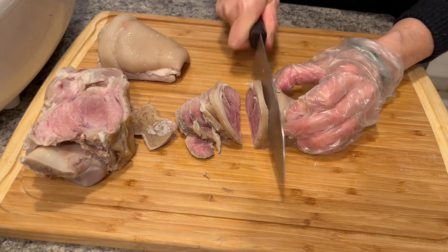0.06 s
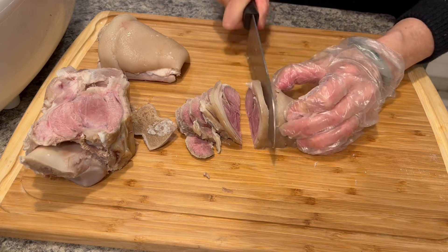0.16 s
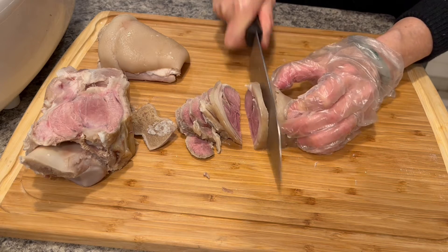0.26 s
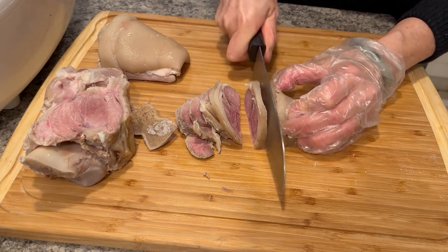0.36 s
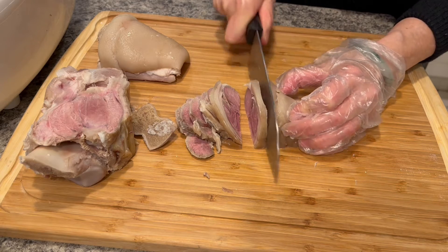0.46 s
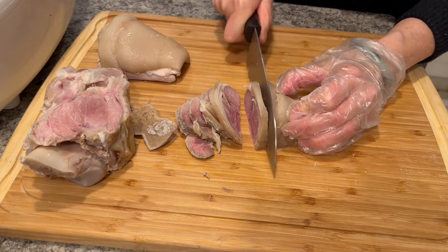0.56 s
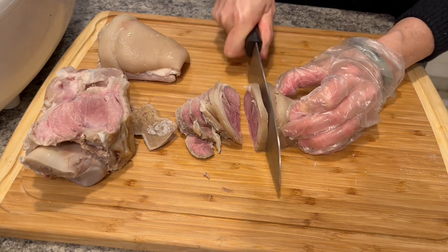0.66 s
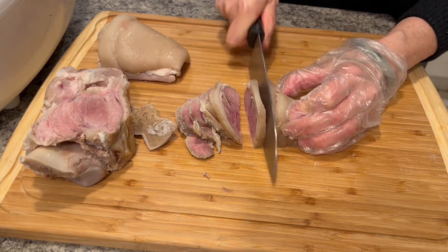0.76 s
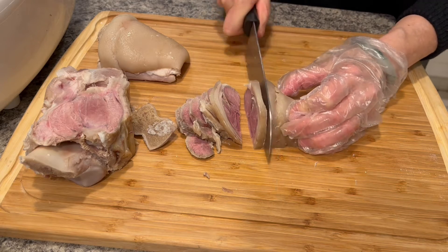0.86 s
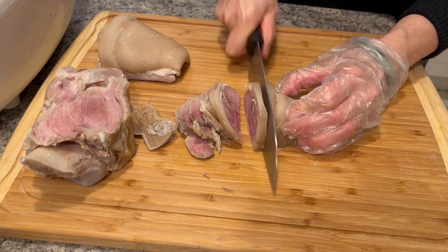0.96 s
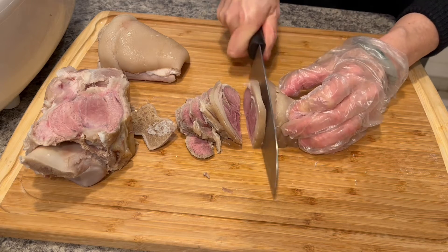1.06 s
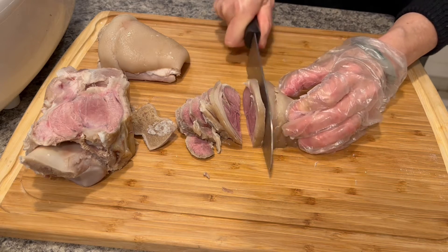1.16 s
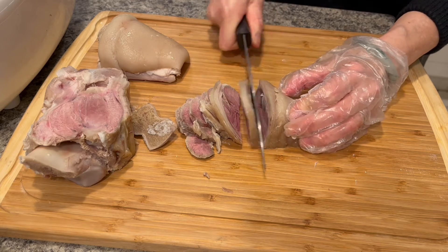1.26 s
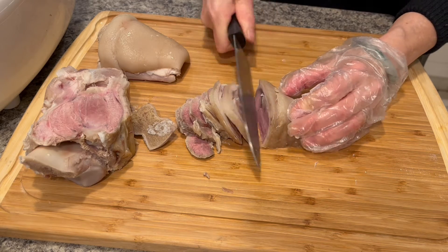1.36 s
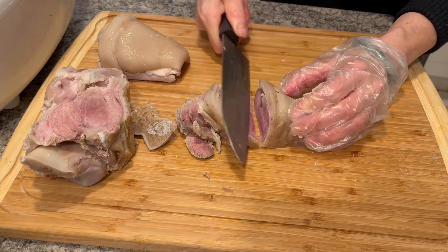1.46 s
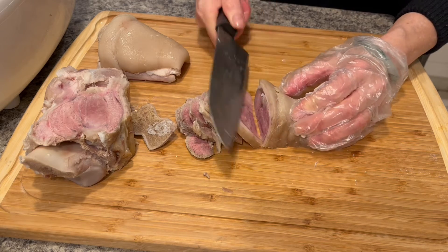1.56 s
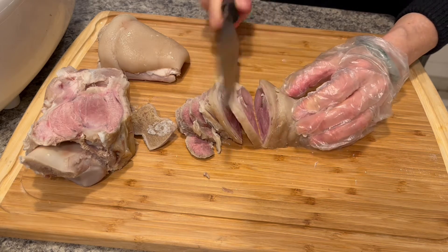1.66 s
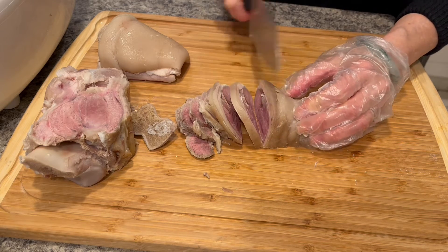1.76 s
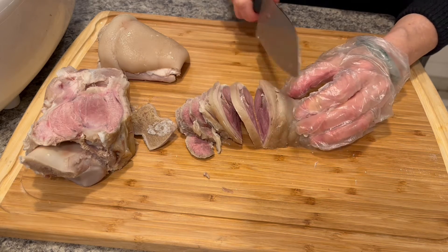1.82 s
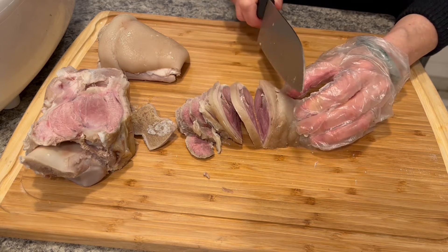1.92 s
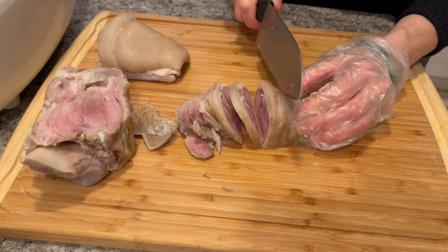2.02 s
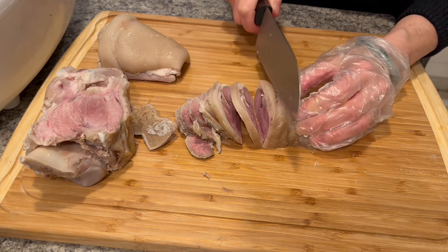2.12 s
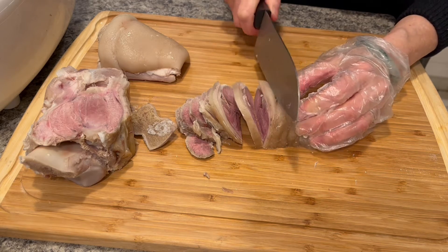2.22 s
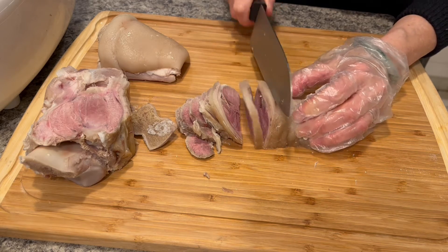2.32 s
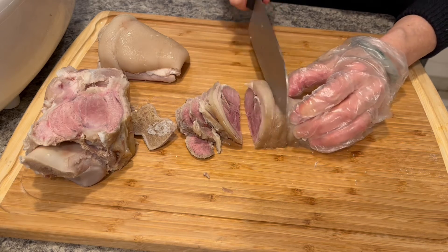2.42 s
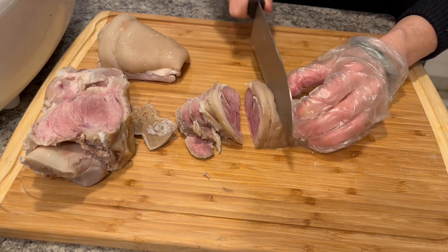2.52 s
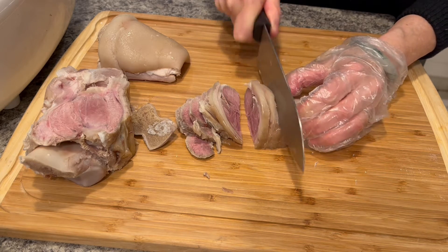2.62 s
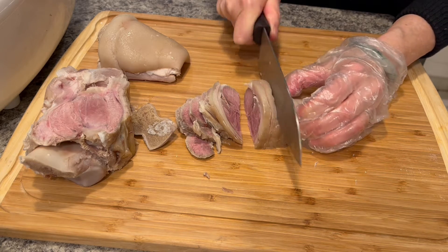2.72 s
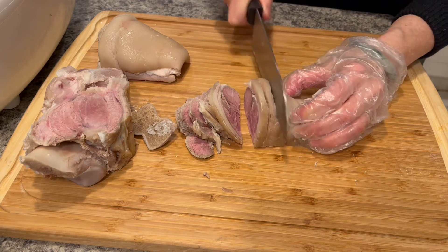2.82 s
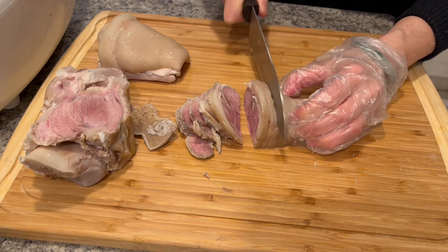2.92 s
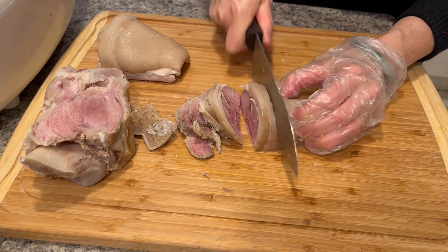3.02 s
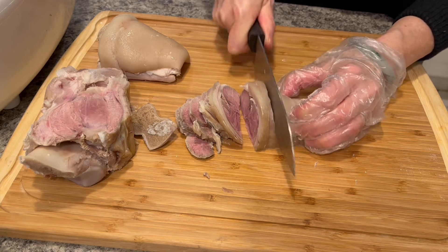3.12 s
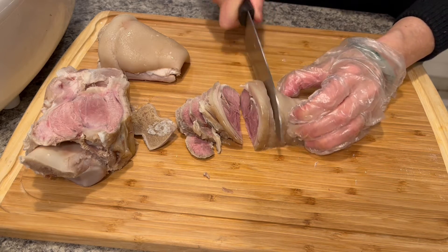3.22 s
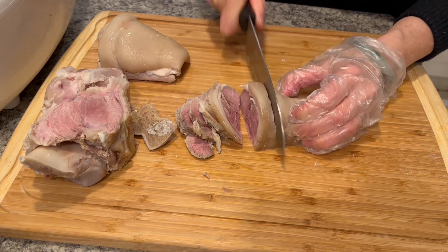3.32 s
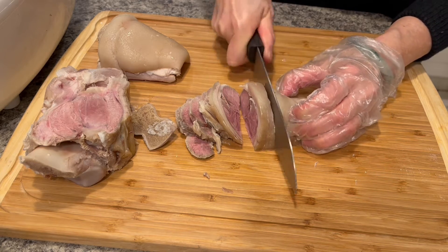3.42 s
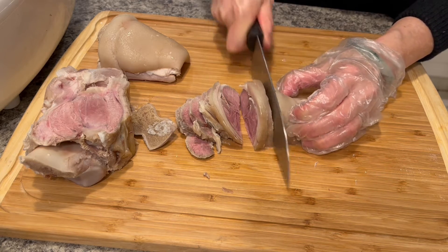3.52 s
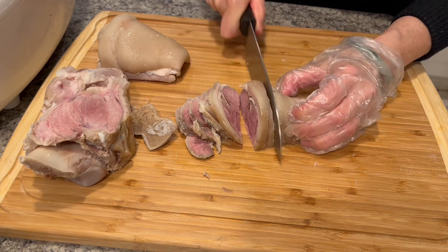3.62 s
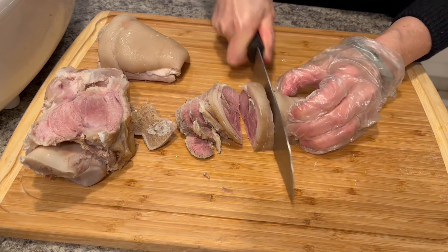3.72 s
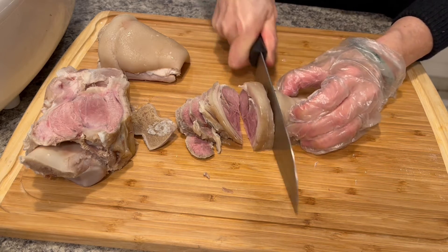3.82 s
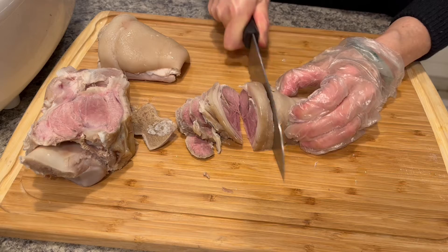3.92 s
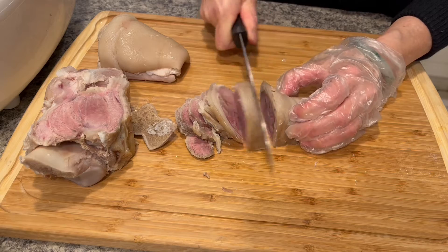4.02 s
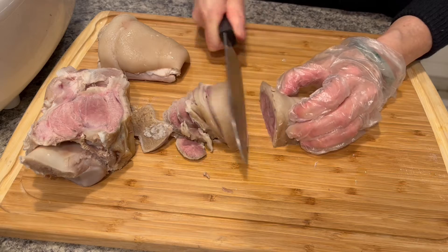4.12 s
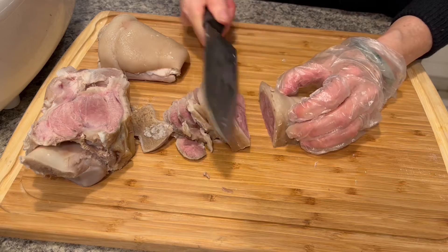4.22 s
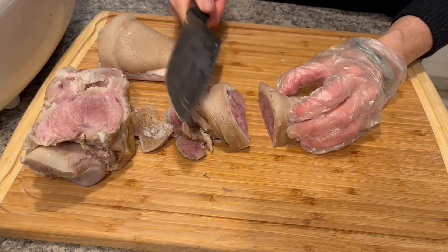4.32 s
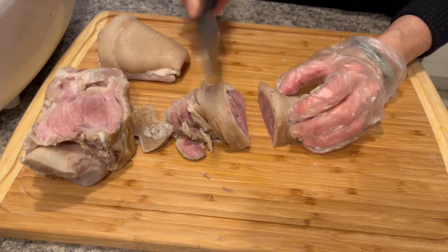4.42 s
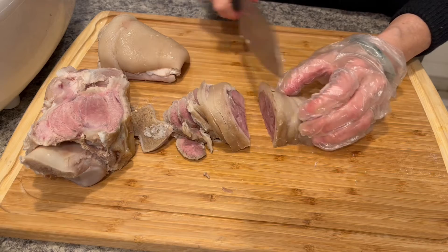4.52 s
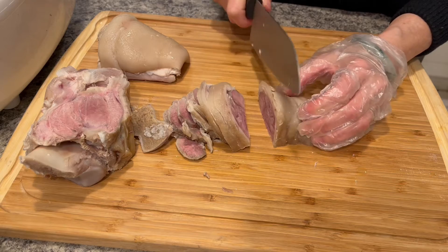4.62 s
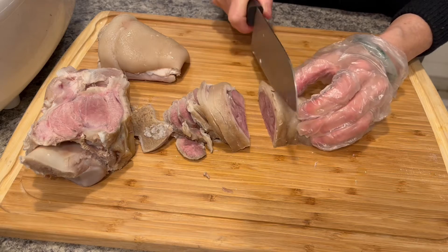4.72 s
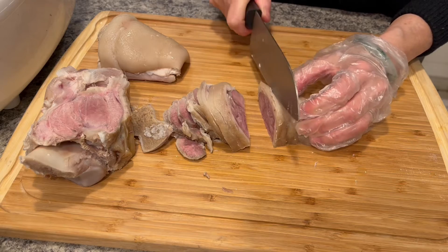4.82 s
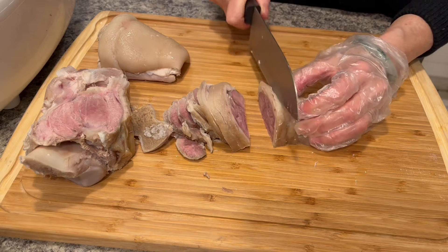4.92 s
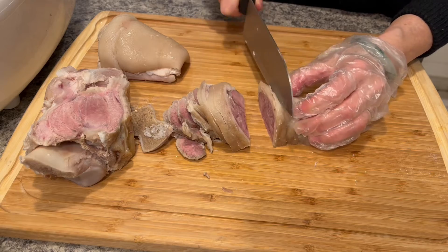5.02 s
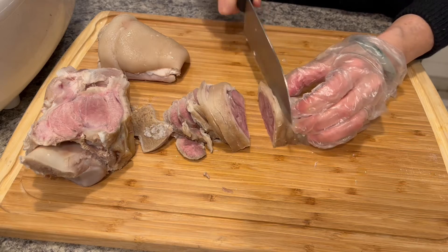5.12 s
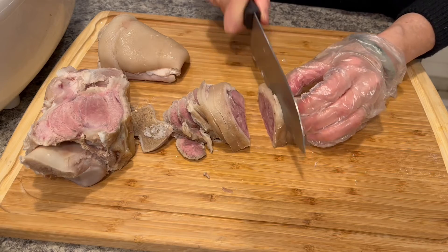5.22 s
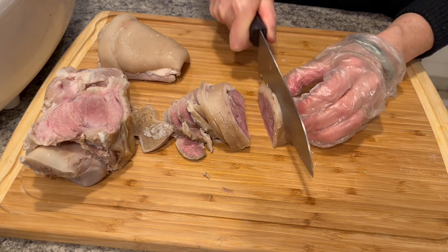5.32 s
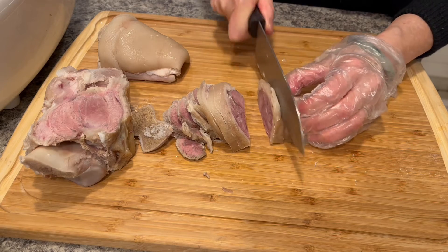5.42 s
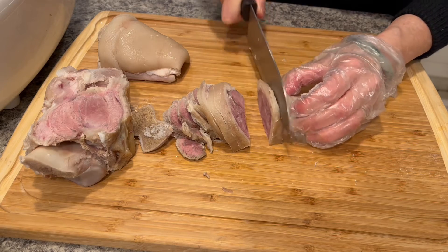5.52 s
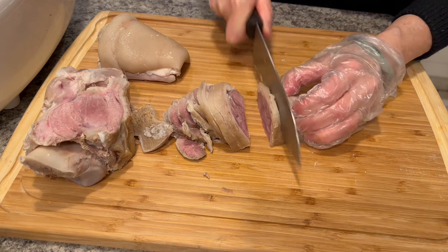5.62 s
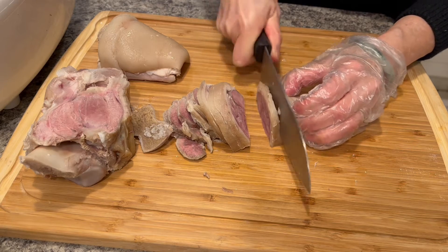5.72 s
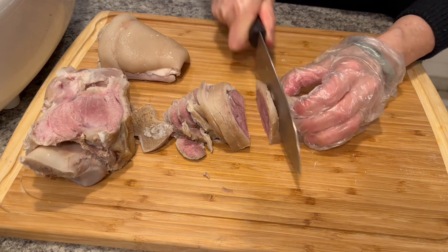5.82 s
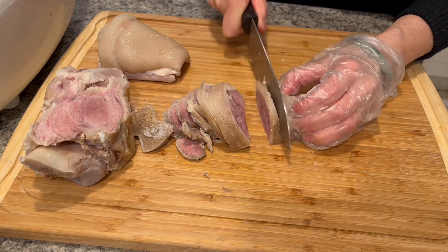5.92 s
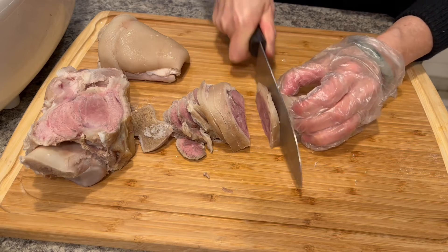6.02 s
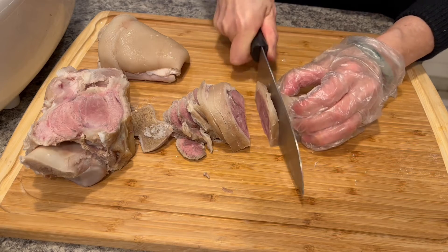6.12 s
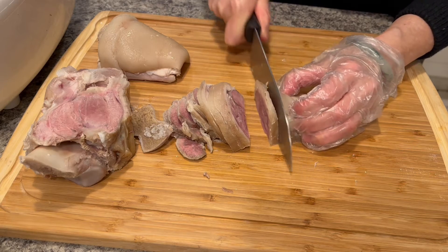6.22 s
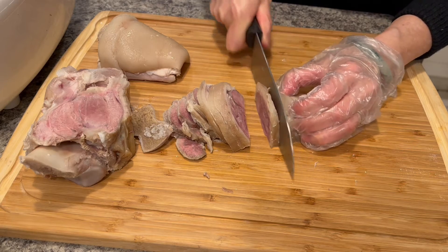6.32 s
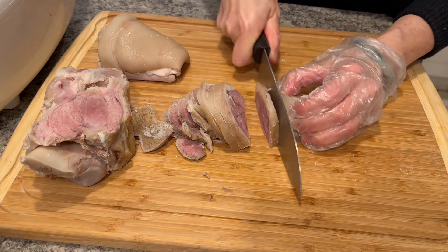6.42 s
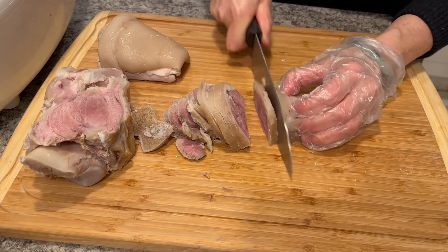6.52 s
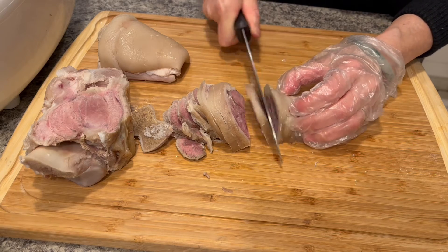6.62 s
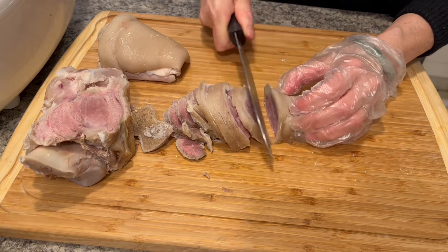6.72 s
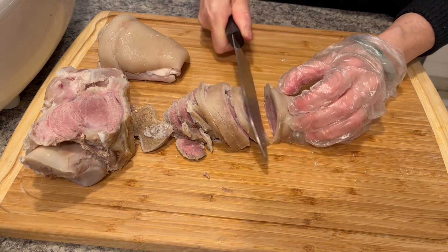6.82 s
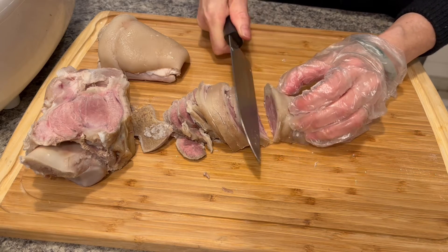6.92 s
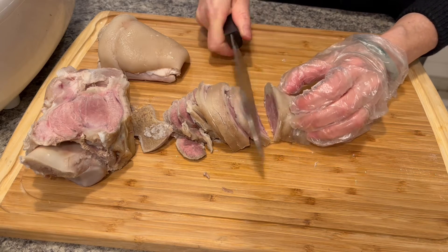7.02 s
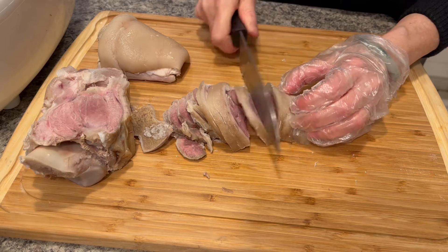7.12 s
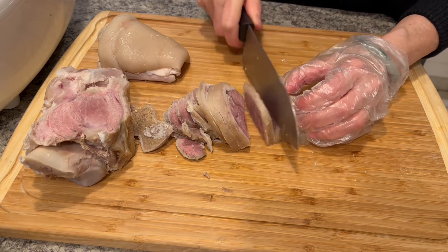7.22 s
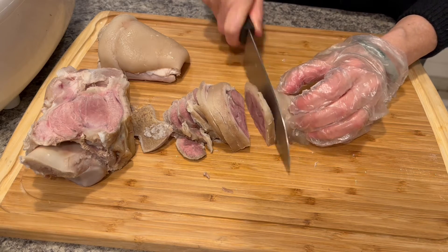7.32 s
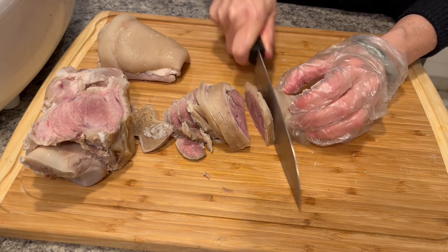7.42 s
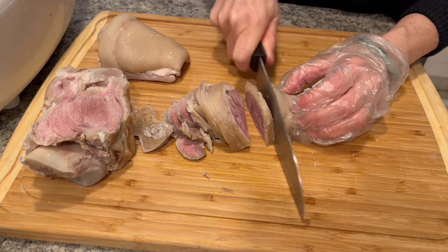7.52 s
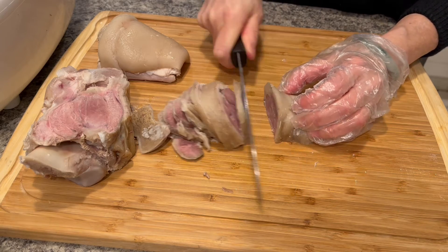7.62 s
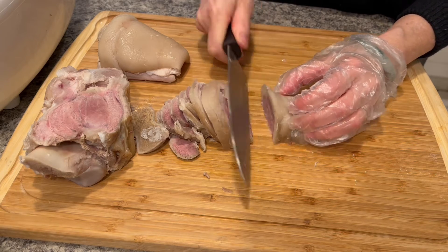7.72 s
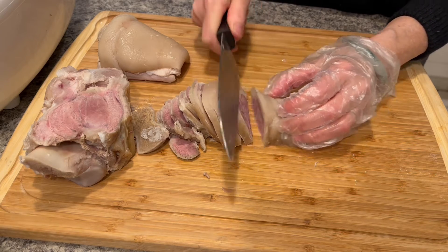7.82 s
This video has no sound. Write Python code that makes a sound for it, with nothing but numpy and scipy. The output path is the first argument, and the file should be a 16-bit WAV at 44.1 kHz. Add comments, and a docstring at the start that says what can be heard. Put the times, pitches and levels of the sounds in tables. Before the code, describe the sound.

Wet, fine crackling follows the back-and-forth strokes of a blade through skin and meat, with little snaps, fibre tears and plastic ticks. Dull bumps come from the meat rocking on a bamboo board. Three short woody scrapes with brief groans mark finished slices; a single sharp clack comes near the end and is by far the loudest event. Close microphone, short indoor reflections, quiet low hum.

```python
"""In a small kitchen, close to the microphone, a chef's knife saws slices off a cooked pork hock on bamboo.
Wet meat and a plastic glove crackle: random clicks, coloured, that follow the strokes. Soft thuds are short
low shudders. Three times the edge breaks through and grates, as slips that ring the board's modes, and is
drawn along the board. Near the end it comes down in one hard knock. Room noise and a faint hum lie beneath,
and counter and walls answer with short noise tails."""
import sys
import numpy as np
from scipy import signal
from scipy.fft import rfft, irfft, next_fast_len
from scipy.io import wavfile
from scipy.ndimage import uniform_filter1d

SR = 44100
rng = np.random.default_rng(int(sys.argv[2]) if len(sys.argv) > 2 else 0)


def file_out(sig):
    """Save sig as 16-bit WAV at sys.argv[1]."""
    # one column per channel
    cols = np.atleast_2d(sig).T
    # limit, then scale
    lim = np.clip(cols, -1, 1)
    pcm = np.round(lim * 32767).astype(np.int16)
    wavfile.write(sys.argv[1], SR, pcm)


N = 346626
T = np.arange(N) / SR


def undb(db):
    """Decibels to gain."""
    return 10 ** (np.asarray(db) / 20)


def unit(x):
    """Scale to rms 1."""
    return x / np.sqrt(np.mean(x ** 2))


def gains(points, size):
    """Gain at each bin of a transform, interpolated over log frequency between (f/Hz, level/dB) points."""
    hz, db = np.transpose(points)
    bins_hz = np.fft.rfftfreq(size, 1 / SR)
    return undb(np.interp(np.log(bins_hz + 1), np.log(hz), db))


def colour(x, points):
    """Filter a sound by the curve through (f/Hz, level/dB) points."""
    size = next_fast_len(x.shape[-1], True)
    return irfft(rfft(x, size) * gains(points, size), size)[..., :x.shape[-1]]


def butter(x, hz, kind, order=2):
    """Plain causal low- or high-pass."""
    return signal.sosfilt(signal.butter(order, hz, kind, fs=SR, output="sos"), x)


def add(out, s, x):
    """Mix x into out from time s on."""
    i = max(int(s * SR), 0)
    out[i:i + len(x)] += x[:N - i]


def fade(t, t60):
    """Exponential decay by 60 dB in t60 seconds."""
    return np.exp(-np.log(1000) * t / t60)


def ring(x, response):
    """Pass a sound through an impulse response."""
    return signal.fftconvolve(x, response)[:len(x)]


def clicks(size, rate, spread_db):
    """Random impulses at a mean rate per second, many small and a few large."""
    hit = rng.random(size) < rate / SR
    sign = rng.choice([-1, 1], size)
    return hit * sign * undb(spread_db * np.minimum(rng.exponential(size=size), 4))


def walk(hz):
    """Slow random wandering, spread about 1."""
    k = int(SR / hz / 2)
    steps = np.repeat(rng.standard_normal(N // k + 1), k)[:N]
    return 1.1 * uniform_filter1d(steps, k)


def shudder(hz, length, judder=0.55):
    """Uneven cycles of one pitch, a sine mixed with noise, that swell and die."""
    t = T[:int(length * SR)]
    shake = unit(butter(rng.standard_normal(SR // 2), 2 * hz, "low"))[:len(t)]
    return np.sin(np.pi * t / length) * (np.sin(2 * np.pi * hz * t) + judder * shake)


def pops(table, t60, octaves, trim_db, order):
    """Each rupture is a brief decaying noise burst around its own pitch, octaves to either side."""
    out, t = np.zeros(N), T[:SR // 20]
    for s, db, hz in table:
        burst = rng.standard_normal(len(t)) * fade(t, t60)
        burst = butter(burst, hz / 2 ** octaves, "high", order)
        pop = butter(burst, min(hz * 2 ** octaves, SR / 3), "low", order=3)
        add(out, s, undb(db + trim_db) * pop / abs(pop).max())
    return out


# how unlike the two microphone ports hear diffuse sound: (f/Hz, side filter level/dB)
PORT_WIDTH = [(60, -18), (160, -16), (350, -4.5), (700, 1), (1400, 1), (12000, -16.5)]


def diffuse(size):
    """Stereo noise from all sides: alike in the bass and the top treble, unlike in the mids."""
    mid, side = rng.standard_normal((2, size))
    side = colour(side, PORT_WIDTH)
    return np.array([mid + side, mid - side])


# colour of the room noise: (f/Hz, relative level/dB)
KITCHEN_COLOUR = [(20, 8), (60, -2.5), (130, 2), (220, -6), (370, -7), (550, -13), (1100, -26.5),
                  (2500, -27.5), (6500, -33.5), (10500, -53), (15500, -44.5)]
# steady tones beneath the scene, an appliance's hum and a faint high note of the steel: (f/Hz, mean level/dB)
STEADY_TONES = [(119, -68), (199, -69), (264, -72), (371, -71.5), (1392, -88.5), (2094, -87)]


def kitchen(air_db=-55.0, waver_rad=0.27, left_db=1.0, swell_db=2.0):
    """Low room noise and steady faint tones, slightly wavering in phase and level."""
    air = unit(colour(diffuse(N), KITCHEN_COLOUR)) * undb(air_db)
    for hz, db in STEADY_TONES:
        drift = unit(butter(rng.standard_normal(N), 1.2, "low"))
        level = np.sqrt(2) * undb(db + swell_db * walk(3))
        air = air + level * np.sin(2 * np.pi * hz * T + waver_rad * drift)
    return air * undb(np.array([[left_db], [-left_db]]) / 2)


# strokes of the blade and of the gloved hand that holds the meat, one cut after another:
# (fastest at t/s, length/s, effort level/dB)
CUT_STROKES = [(0.002, 0.24, -56.5), (0.241, 0.17, -60), (0.392, 0.2, -58.5), (0.567, 0.32, -62.5),
               (0.796, 0.28, -60), (0.983, 0.15, -59.5), (1.138, 0.16, -60), (1.306, 0.26, -59.5),
               (1.564, 0.41, -63), (1.767, 0.15, -67.5), (1.952, 0.056, -66), (2.477, 0.4, -60.5),
               (2.758, 0.13, -60.5), (2.976, 0.22, -58.5), (3.173, 0.17, -60.5), (3.358, 0.36, -60.5),
               (3.542, 0.28, -62.5), (3.737, 0.31, -58.5), (3.901, 0.44, -62.5), (4.506, 0.32, -58),
               (5.071, 0.49, -63), (5.2, 0.22, -61), (5.419, 0.17, -61.5), (5.635, 0.2, -59.5),
               (5.802, 0.22, -62), (5.999, 0.25, -61), (6.162, 0.17, -63), (6.313, 0.078, -58),
               (6.387, 0.082, -53), (6.57, 0.33, -61), (6.703, 0.13, -57.5), (6.916, 0.062, -67.5),
               (7.062, 0.15, -63.5), (7.426, 0.17, -59), (7.598, 0.073, -52), (7.86, 0.32, -54)]


def effort(linger_s=0.56, linger_db=-6.5, rest_db=-81):
    """Strength of the sawing in dB: each stroke's speed is half a sine, and meat and glove shift around it."""
    power = np.zeros(N)
    for s, length, db in CUT_STROKES:
        speed = np.sin(np.pi * T[:int(length * SR)] / length)
        early = max(int((length / 2 - s) * SR), 0)  # a stroke may be under way from the start
        add(power, s - length / 2, ((undb(db) * speed) ** 2)[early:])
    linger = undb(linger_db) ** 2 * uniform_filter1d(power, int(linger_s * SR))
    return 10 * np.log10(power + linger + undb(rest_db) ** 2)


def shifting(x, patchy_db, patchy_hz):
    """Skin, fat and lean tear at different pitches, so each band swells and sinks on its own."""
    out, rest = 0, x
    for hz in 700 * 1.5 ** np.arange(7):  # peel off one band after another from below
        band = signal.sosfiltfilt(signal.butter(3, hz, fs=SR, output="sos"), rest)
        out = out + band * undb(patchy_db * walk(patchy_hz))
        rest = rest - band
    return out + rest


def sawing(level_db, spectrum, busy_rate, spread_db, flutter_db, patchy_db, patchy_hz):
    """Countless tiny ruptures in flurries as the blade catches and lets go; a slow blade makes them sparse."""
    level = undb(level_db)
    activity = np.clip(level / np.percentile(level, 90), .03, 1)
    grip = undb(flutter_db * unit(butter(rng.standard_normal(N), 45.0, "low")))
    # sparser grains are each made stronger, so that the level alone sets the loudness
    grains = grip * clicks(N, busy_rate * activity, spread_db) / np.sqrt(activity)
    return level * unit(shifting(colour(grains, spectrum), patchy_db, patchy_hz))


# colour of the wet crackle: (f/Hz, relative level/dB)
CRACKLE_COLOUR = [(1500, -3.5), (4000, -4), (6000, 3.5), (8000, 4), (11000, 6.5), (14000, 2), (15500, -8)]


def wet_crackle(stroke_db):
    """Wet meat and glove crackle in dense bright ruptures that follow the stroke."""
    return sawing(stroke_db + 1.5, CRACKLE_COLOUR, busy_rate=4200, spread_db=4.5,
                  flutter_db=2.0, patchy_db=0.5, patchy_hz=29.8)


# colour of the rubbing in the cut: (f/Hz, relative level/dB)
RUB_COLOUR = [(200, 8.5), (450, -6.5), (750, 5.5), (1100, 2.5), (1700, 1.5), (2800, 5.5), (4500, 2),
              (7000, -20), (8500, -65)]


def flank_rub(stroke_db, rub_db=-60.0, growth=1.02, busy_db=-58):
    """The blade's flanks rub in the cut, at rub_db when the effort is busy_db, nearly in step with it."""
    return sawing(rub_db + growth * (stroke_db - busy_db), RUB_COLOUR, busy_rate=1800, spread_db=3.0,
                  flutter_db=2.5, patchy_db=2.0, patchy_hz=15)


# colour of the glove's ticks: (f/Hz, relative level/dB)
GLOVE_COLOUR = [(3000, -17), (7500, -8), (11500, -3.5), (15500, -14)]


def glove(db=-78, tick_rate=35, spread_db=2.0):
    """The thin plastic ticks sparsely throughout, whatever the blade does."""
    return undb(db) * unit(colour(clicks(N, tick_rate, spread_db), GLOVE_COLOUR))


def crinkle(level_db, tick_rate=150, spread_db=1.8):
    """More ticks of the glove's plastic, which grow with the stroke."""
    return undb(level_db) * unit(colour(clicks(N, tick_rate, spread_db), GLOVE_COLOUR))


# the blade's push rocks the meat on the board: (start t/s, length/s, level/dB)
MEAT_THUDS = [(0.059, 0.098, -54.5), (0.259, 0.052, -50), (0.779, 0.098, -51.5), (1.144, 0.11, -52.5),
              (2.187, 0.032, -55), (2.583, .11, -48), (2.785, 0.11, -50), (3.055, 0.04, -44.5),
              (3.218, 0.096, -51), (3.389, 0.078, -49.5), (5.181, 0.057, -51.5), (5.417, 0.028, -49.5),
              (5.484, 0.061, -49), (5.671, 0.06, -45), (5.845, 0.091, -48), (7.589, 0.077, -61)]


def thuds(rock_hz=77, scatter_octaves=0.054):
    """The meat rocks under a hard push, each time at a slightly different low pitch."""
    out = np.zeros(N)
    for s, length, db in MEAT_THUDS:
        hz = rock_hz * 2 ** (scatter_octaves * rng.standard_normal())
        add(out, s, undb(db) * shudder(hz, length))
    return out


# fibres of the meat tear under the edge: (t/s, peak level before trim/dB, centre f/Hz)
FIBRE_TEARS = [(0.113, -45.5, 3410), (0.561, -44, 3140), (0.744, -48, 2460), (0.888, -49.5, 2380),
               (1.084, -45, 2900), (2.431, -44, 4100), (2.476, -43, 2470), (2.879, -48, 2520),
               (2.954, -49, 3250), (3.186, -46, 1910), (3.461, -46, 3310), (3.477, -42, 3300),
               (4.475, -47, 3450), (4.582, -45.5, 3320), (5.179, -42.5, 4000), (5.223, -45, 2870),
               (5.953, -42.5, 4700), (6.072, -40.5, 3270), (6.300, -46, 3670), (7.064, -49, 2730)]


def tears():
    """Fibres tear in short rasps of mid-pitched noise."""
    return pops(FIBRE_TEARS, t60=0.042, octaves=0.26, trim_db=-2.5, order=2)


# what the bamboo board rings with under the blade: (f/Hz, level/dB, t60 before scaling/s)
BOARD_MODES = [(69.3, -27.5, 0.12), (94, -22, 0.082), (146.5, -26, 0.19), (206.2, -28, .12),
               (249, -25.5, 0.09), (294.5, -25.5, 0.085), (345, -25, 0.077), (401, -27.5, 0.04),
               (483, -27, 0.054), (535, -30.5, 0.046), (606.6, -31.5, 0.15), (667, -24, 0.035),
               (741, -20, .075), (800, -24, 0.08), (955, -11.5, 0.038), (1014, -21, 0.055),
               (1053.5, -14, 0.089), (1193, -18.5, 0.072), (1297, -25, 0.087), (1380, -17.5, 0.041),
               (1476, -17, 0.039), (1670, -16.5, 0.021), (1768, -20, 0.05), (1885, -14, 0.026),
               (2110, -25.5, 0.045), (2190, -27, 0.035), (2510, -16, 0.009), (2676, -19, 0.009),
               (2870, -14, 0.0083), (3100, -27, 0.031), (3570, -22, 0.0056), (3830, -28.5, 0.03),
               (5600, -28, 0.014), (6430, -24, 0.0093)]


def board_response(ring_share=1, after_db=-22, after_stretch=2.9):
    """The board's modes after an ideal tap: quick decay plus weak longer ring, neighbours in opposite senses."""
    t = T[:SR // 2]
    out = np.zeros(len(t))
    for k, (hz, db, t60) in enumerate(BOARD_MODES):
        t60 = t60 * ring_share
        decay = fade(t, t60) + undb(after_db) * fade(t, t60 * after_stretch)
        out += (-1) ** k * undb(db) * np.sin(2 * np.pi * hz * t) * decay
    return out


def pressed_board():
    """The pressed blade damps the board: a shorter, weaker ring without the deep bass."""
    return butter(board_response(ring_share=0.96, after_db=-29), 120, "high")


def push(ms):
    """Force of one contact, area 1: the longer its time scale, the duller the sound."""
    t = T[:SR // 10] / (ms / 1000)
    force = t * np.exp(-2 * t)
    return force / force.sum()


# colour of the sliding contact: (f/Hz, relative level/dB)
CONTACT_COLOUR = [(150, 7), (300, 8), (420, 8), (600, 6.5), (740, 2.5), (1050, 1), (1200, -0.5),
                  (1320, -5.5), (1480, 1.5), (1700, -1.5), (2100, -6), (2900, -20), (4000, -10)]
# colour of the grit: (f/Hz, relative level/dB)
GRIT_COLOUR = [(600, -6), (1500, 8.5), (1900, 6), (2250, 6.5), (2850, 2), (3350, 2), (3830, 10),
               (4300, -5.5), (4750, 2), (5300, -3), (6500, -1.5), (11000, -46), (15000, -28)]


def grate(board, rise, hold, fall, chatter_hz, q, grit_db, rasp_db):
    """The edge catches and slips in bunches: each slip taps the board, rasps the blade and spits a little grit."""
    catch_db, catch_hz = 2.5, 130
    rasp_hz, rasp_octaves = 2794, 0.2  # centre and half width of the blade's rasp
    size = len(board)
    pressure = np.interp(T[:size], np.cumsum([0, rise, hold, fall]), [0, 1, 1, 0])
    catch = unit(butter(rng.standard_normal(size), catch_hz, "low"))
    catch = undb(catch_db * np.clip(catch, -2, 2))
    slips = pressure * catch * clicks(size, rate=2000, spread_db=2.0)
    force = signal.lfilter(*signal.iirpeak(chatter_hz, q, fs=SR), slips)  # the springy blade favours one rate
    edges = rasp_hz * 2 ** (rasp_octaves * np.array([-1, 1]))
    rasp = signal.sosfilt(signal.butter(3, edges, "band", fs=SR, output="sos"), slips)
    sound = unit(colour(ring(force, board), CONTACT_COLOUR))
    sound = sound + undb(grit_db) * unit(colour(slips, GRIT_COLOUR)) + undb(rasp_db) * unit(rasp)
    return sound * np.sqrt(np.mean(pressure ** 2))


# the edge is drawn along the board:
# (start t/s, length/s, level before pressure/dB, chatter f/Hz, grit relative level/dB)
BOARD_DRAGS = [(0.245, 0.13, -59, 278, -10), (1.065, .05, -54, 600, -15), (1.09, 0.095, -46.5, 460, -6),
               (3.36, 0.071, -56, 288, -7), (3.855, 0.099, -41.5, 363, -11.5),
               (5.672, 0.045, -59, 230, -22), (6.031, 0.088, -58.5, 353, -10),
               (6.485, 0.12, -44.5, 398, -11), (7.574, 0.056, -51.5, 198, -1)]


def drags(board):
    """A drag of the edge along the board swells and fades."""
    out = np.zeros(N)
    for s, length, db, hz, grit_db in BOARD_DRAGS:
        rise, hold, fall = length * np.array([0.16, 0.53, 0.31])
        add(out, s, undb(db) * grate(board, rise, hold, fall, hz, 1, grit_db, rasp_db=-14))
    return out


# the sliding edge falls into a regular stick-slip: (start t/s, length/s, level/dB, pitch f/Hz)
EDGE_GROANS = [(0.953, 0.024, -37.5, 262), (0.957, 0.055, -36, 1059), (0.978, 0.058, -46, 754),
               (1.122, 0.035, -35, 257), (1.159, 0.022, -38, 346), (3.735, 0.034, -30, 296.4),
               (3.89, 0.037, -44.5, 248), (3.951, 0.023, -46.5, 330), (6.386, 0.0194, -32, 223),
               (6.527, 0.032, -39.5, 279), (6.555, 0.023, -43, 763), (6.585, 0.015, -41, 297),
               (7.588, 0.045, -44, 149)]


def groans():
    """The edge's regular stick-slip groans briefly at one pitch."""
    out = np.zeros(N)
    for s, length, db, hz in EDGE_GROANS:
        add(out, s, undb(db) * shudder(hz, length, judder=0.31))
    return out


# the edge breaks through to the board: (t/s, rise/s, pressed for/s, level before pressure/dB, chatter f/Hz,
# grit relative level/dB, rasp relative level/dB, thump level/dB, thump f/Hz)
BREAKTHROUGHS = [(.955, 0.00089, 0.037, -38, 850, -12.5, -12, -42, 90),
                 (3.728, 0.0013, 0.022, -32.5, 360, -8.5, -20, -36, 66),
                 (6.368, 0.0096, 0.013, -36, 400, -9, -17.5, -43, 89.6)]


def breakthroughs(board, landing_db=5, landing_ms=0.17, fall_s=0.043, thump_s=0.08):
    """The edge lands abruptly with a low bump of the board, grates on it and eases off."""
    out = np.zeros(N)
    for s, rise, hold, db, hz, grit_db, rasp_db, thump_db, thump_hz in BREAKTHROUGHS:
        add(out, s, undb(db + landing_db) * ring(board, push(landing_ms)))
        add(out, s, undb(db) * grate(board, rise, hold, fall_s, hz, 0.3, grit_db, rasp_db))
        add(out, s, undb(thump_db) * shudder(thump_hz, thump_s))
    return out


# single wet snaps of skin, fat and glove: (t/s, peak level before trim/dB, centre f/Hz)
WET_SNAPS = [(1.6202, -36, 10700), (1.7423, -42, 11300), (1.926, -47, 11000), (2.175, -44, 11500),
             (2.391, -39, 12100), (2.4004, -37, 11000), (3.095, -50, 11600), (3.8312, -52, 12100),
             (4.779, -41, 10800), (5.2876, -47, 11400), (5.3684, -47, 11300), (5.4425, -43, 11800),
             (5.5697, -43, 12300), (5.5915, -37.5, 12200), (5.6261, -35, 11700), (5.7955, -36, 11600),
             (6.1438, -36.5, 10900), (6.8183, -44.5, 11300), (7.112, -43, 11300), (7.227, -46, 11000)]


def snaps():
    """Skin, fat and glove snap in brief bright bursts."""
    return pops(WET_SNAPS, t60=0.011, octaves=0.33, trim_db=0.5, order=1)


# the thin steel sings as it slides or comes free: (start t/s, length/s, mean level/dB, f/Hz)
STEEL_NOTES = [(1.76, 0.34, -86.5, 2089), (1.8, .4, -85, 2789), (1.75, .35, -86, 3935),
               (2.56, 0.32, -78, 2495), (2.82, 0.23, -81, 2370), (3.96, 0.28, -82.5, 2094),
               (4.56, 0.2, -79, 2094), (5.48, .07, -76, 2400), (6.32, 0.054, -66, 2400)]


def singing(waver_db=5.5):
    """Thin faint notes of the steel swell and die, unsteady in level."""
    out = np.zeros(N)
    for s, length, db, hz in STEEL_NOTES:
        t = T[:int(length * SR)]
        swell = np.sqrt(2 * np.sin(np.pi * t / length))
        add(out, s, undb(db) * swell * np.sin(2 * np.pi * hz * t))
    return out * undb(waver_db * walk(12))


# the edge clicking through gristle: (t/s, peak level before trim/dB, centre f/Hz)
GRISTLE_CLICKS = [(2.7935, -32.5, 5200)]


def gristle():
    """The edge clicks through gristle in a narrow, short burst."""
    return pops(GRISTLE_CLICKS, t60=0.023, octaves=0.13, trim_db=-1.5, order=4)


def clack(hz, t60, rise_s):
    """The hard steel meets the bamboo: a few very quick cycles."""
    t = T[:SR // 50]
    burst = np.sin(2 * np.pi * hz * t) * fade(t, t60) * (1 - np.exp(-t / rise_s))
    return burst / abs(burst).max()


# the dense, quickly damped rattle of the bamboo between its modes: (f/Hz, relative level/dB)
FIBRE_COLOUR = [(150, -17), (300, 3), (500, -3), (900, 6), (1700, -2), (2200, -10), (2800, -18),
                (3300, -14), (4200, -19), (5500, -33), (9000, -38)]
# hard blows of the edge on the board: (t/s, level/dB, contact time scale/ms)
EDGE_KNOCKS = [(7.3226, 0, 0.067)]


def knocks(board):
    """The edge clacks on bare bamboo, flexes it, wakes every mode and jolts the meat; fibres rattle after."""
    out, t = np.zeros(N), T[:SR // 20]
    for s, db, ms in EDGE_KNOCKS:
        add(out, s, -undb(db) * ring(board, push(ms)))
        add(out, s, -undb(db - 9.5) * clack(hz=2650, t60=0.0051, rise_s=.0006))
        flex = np.sin(2 * np.pi * 290 * t) * fade(t, 0.015)
        add(out, s, undb(db - 13) * flex)
        add(out, s, undb(db - 29) * shudder(hz=80, length=0.045))
        rattle = unit(colour(rng.standard_normal(len(t)), FIBRE_COLOUR)) * np.minimum(t / 0.0027, 1)
        add(out, s, undb(db - 24) * rattle * fade(t, 0.06))
        tick = rng.standard_normal(len(t)) * fade(t, 0.0067)
        add(out, s, undb(db - 37) * tick)
    return out


def ports(x, lag_ms, left_db):
    """Direct sound at the two microphone ports; a positive lag means the left one hears it later."""
    size = next_fast_len(N, True)
    delay = np.exp(-2j * np.pi * np.fft.rfftfreq(size, 1 / SR) * lag_ms / 1000)
    late = irfft(rfft(x, size) * delay, size)[:N]
    return np.array([late * undb(left_db / 2), x * undb(-left_db / 2)])


def counter(x, early_db=-8, t60=0.047, size_hz=500, build_s=0.0029):
    """Worktop, bowl and cook scatter a quick wide burst right behind each sound."""
    t = T[:SR // 5]
    burst = diffuse(len(t)) * fade(t, t60) * np.minimum(t / build_s, 1)
    burst = butter(burst, size_hz, "high")  # small things scatter little bass
    return undb(early_db) * np.array([ring(x, side) for side in unit(burst) / np.sqrt(len(t))])


# colour of the walls' answer: (f/Hz, relative level/dB)
WALL_COLOUR = [(50, -5), (150, -7.5), (350, -0.5), (700, 0), (1200, -1), (2000, -1), (2800, -5), (5000, 0),
               (12000, -11.5)]


def room(x, wet_db, t60_low=0.46, t60_high=0.38, split_hz=400, build_s=0.017):
    """Cupboards and walls return a short dense tail whose lows stay longest."""
    t = T[:int(.7 * SR)]
    noise = diffuse(len(t))
    low = butter(noise, split_hz, "low", order=1)
    tail = low * fade(t, t60_low) + (noise - low) * fade(t, t60_high)
    tail = tail * np.minimum(t / build_s, 1)
    tail = colour(unit(tail) / np.sqrt(len(t)), WALL_COLOUR)
    return undb(wet_db) * np.array([ring(x, side) for side in tail])


def scene():
    """Board and meat close to the microphone, the kitchen around them."""
    stroke_db = effort()
    bright = wet_crackle(stroke_db) + snaps()
    plastic = glove() + crinkle(stroke_db - 8.5)
    cut = flank_rub(stroke_db) + tears() + gristle() + singing()
    pressed = pressed_board()
    wood = thuds() + drags(pressed) + groans() + breakthroughs(pressed) + knocks(board_response())
    near = ports(wood, lag_ms=-0.0015, left_db=2.0) + ports(cut, lag_ms=-0.027, left_db=0.5)
    near += ports(bright, lag_ms=0, left_db=0.0) + ports(plastic, lag_ms=0.0082, left_db=0.0)
    spreading = wood + bright + plastic + cut
    return near + counter(spreading) + room(spreading, wet_db=-5.5) + kitchen()


# how far the left channel trails the right in the treble: (f/Hz, phase/rad)
TREBLE_PHASE = [(4800, 0), (5500, 1.64), (7000, 1.73), (8300, 2.5), (11500, 7), (12800, 6.5), (15500, 10.5)]


def record(dry):
    """The phone turns the treble of its two channels apart, drops the deep bass and cuts the top."""
    size = next_fast_len(N, True)
    turn = np.interp(np.fft.rfftfreq(size, 1 / SR), *np.transpose(TREBLE_PHASE))
    left = irfft(rfft(dry[0], size) * np.exp(-1j * turn), size)[:N]
    lean = butter(np.array([left, dry[1]]), 49.0, "high", order=4)
    top_cut = signal.ellip(8, .2, 70, 15700, fs=SR, output="sos")  # ripple dB, stopband dB, edge Hz
    return signal.sosfilt(top_cut, lean)


dry = scene()
out = record(dry)
file_out(out)
```